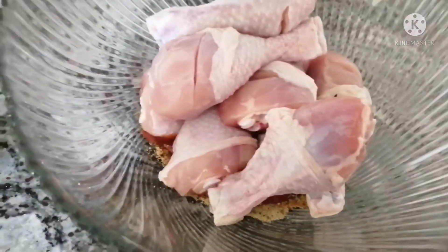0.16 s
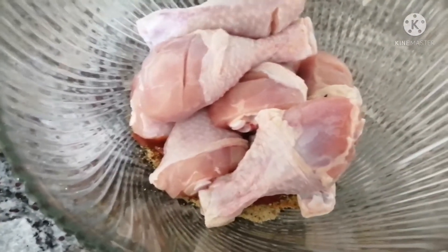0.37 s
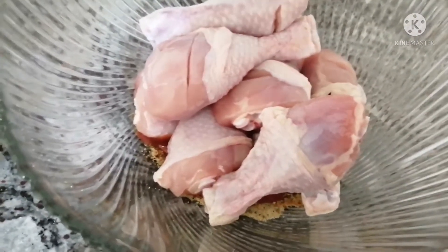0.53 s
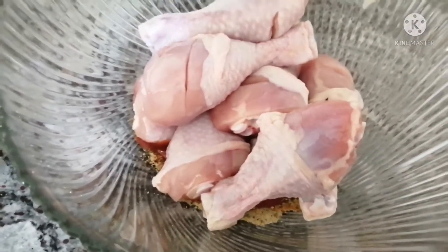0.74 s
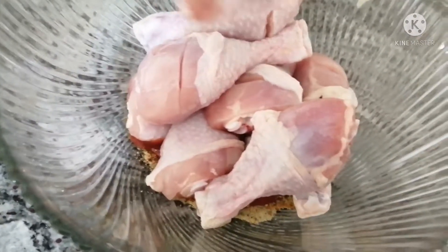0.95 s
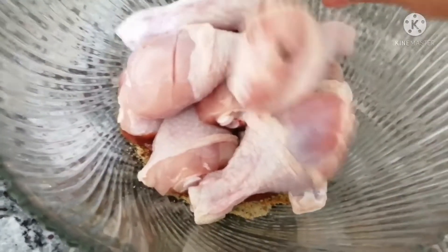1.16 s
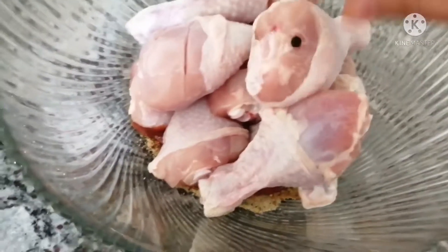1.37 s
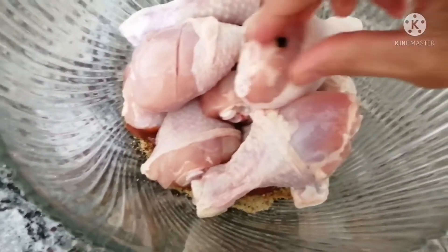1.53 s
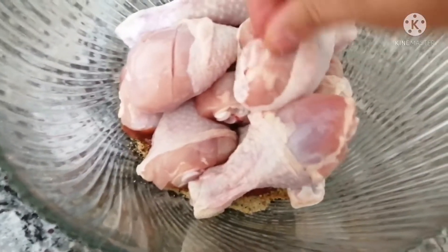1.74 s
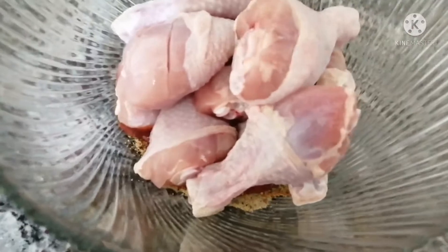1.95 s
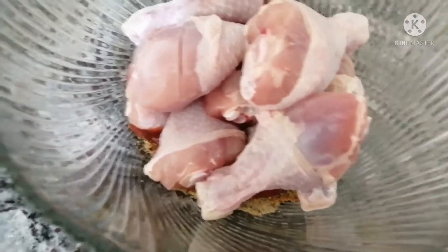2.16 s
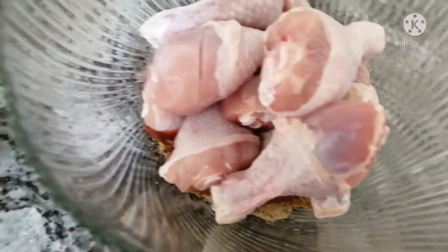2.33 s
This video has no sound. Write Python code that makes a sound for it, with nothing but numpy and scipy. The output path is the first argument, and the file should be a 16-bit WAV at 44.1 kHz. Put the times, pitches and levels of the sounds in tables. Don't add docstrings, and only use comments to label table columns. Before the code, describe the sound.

Close stereo microphone near a worktop: two quick hollow knocks bounce off the walls and fade slowly over an appliance buzz, followed by a faint thud and glass ping, small wet ticks and a brief peeling rustle.

```python
import sys
import numpy as np
from scipy import signal
from scipy.fft import rfft, irfft, next_fast_len
from scipy.io import wavfile
from scipy.ndimage import uniform_filter1d, map_coordinates

SR = 44100
rng = np.random.default_rng(int(sys.argv[2]) if len(sys.argv) > 2 else 0)


def decibels_to_gain(level_db):
    exponent = np.asarray(level_db, float) / 20
    return 10 ** exponent


def wav_record(signal):
    frames = np.transpose(np.atleast_2d(signal))
    bounded = np.clip(frames, -1, 1)
    quanta = np.round(bounded * 32767).astype(np.int16)
    wavfile.write(sys.argv[1], SR, quanta)


N = 110250
SIDES = np.array([[.5], [-.5]])

# (time [s], level [dB], crack level [dB], near wall delay [s], pan of the lowest note [dB])
BLOWS = [
    (.2381, -15, -9, 0.0105, 4),
    (.4133, -10.5, -11, .0078, -2),
]


def unit(x):
    return x / np.sqrt(np.mean(x ** 2) + 1e-20)


def along(points, hz):
    f, v = np.transpose(points)
    return np.interp(np.log(hz + 1), np.log(f + 1), v)


def wobble(rate):
    knots = rng.standard_normal(int(N * rate / SR) + 4)
    return map_coordinates(knots, [np.arange(N) * rate / SR])


def filtered(x, response):
    m = next_fast_len(x.shape[-1] + 8192)
    spectrum = rfft(x, m) * response(np.fft.rfftfreq(m, 1 / SR))
    return irfft(spectrum, m)[..., :x.shape[-1]]


def rush(spectrum):
    return unit(filtered(rng.standard_normal((2, N)), lambda hz: decibels_to_gain(along(spectrum, hz))))


def spread(pair, alike, pan, lead_s):
    def mix(hz):
        turn = np.arccos(np.clip(along(alike, hz), -1, 1)) / 2
        return np.array([np.cos(turn), np.sin(turn)])

    def place(hz):
        return decibels_to_gain(SIDES * along(pan, hz)) * np.exp(2j * np.pi * hz * lead_s * SIDES)

    mid, side = filtered(pair, mix)
    return filtered(np.array([mid + side, mid - side]), place)


def add(out, x, s, pan_db=0, lag_s=0):
    x = np.broadcast_to(x, (2, x.shape[-1]))
    for ch in range(2):
        part = out[ch, round((s + ch * lag_s) * SR):][:x.shape[1]]
        part += x[ch, :len(part)] * decibels_to_gain(pan_db * (.5 - ch))


def decay(db, t60, rise_s):
    t = np.arange(SR // 3) / SR
    return decibels_to_gain(db - 60 * t / t60) * (1 - np.exp(-t / rise_s))


def mode(hz, db, t60, rise_s):
    return decay(db, t60, rise_s) * np.sin(2 * np.pi * hz * np.arange(SR // 3) / SR)


def hum():
    # (multiple of the fundamental, level [dB])
    harmonics = [(2, -62), (3, -63.5), (4, -70), (5, -71.5), (6, -66), (7, -64.5), (8, -65.5), (9, -62.5)]
    # (frequency [Hz], density [dB per Hz])
    drone_colour = [(12, -44), (20, -1), (37, -4.5), (101, -5), (140, -6), (214, -10.5), (380, -2),
                    (407, -8), (520, -23.5), (680, -78), (1140, -120)]
    # (frequency [Hz], density [dB per Hz])
    hiss_colour = [(300, -27), (500, -4), (1900, -14), (2800, -9.5), (4000, -19), (5300, -9), (7000, -20),
                   (15000, -23)]
    # (frequency [Hz], left minus right [dB])
    balance = [(60, -1), (240, -6), (950, -3), (3770, -3), (15000, 0.5)]
    # (time [s], gain [dB])
    gain = [(0, -0.5), (.24, 0.5), (.27, -4.5), (.7, -4.5), (1.0, -1), (2.5, -1)]
    fundamental_hz, drift_rad, waver_db, scatter_rad = 43.35, 0.17, 1, 0.14
    t = np.arange(N) / SR
    turns = fundamental_hz * t + drift_rad * wobble(6) / (2 * np.pi)
    lines = 0
    for multiple, db in harmonics:
        level = np.sqrt(2) * decibels_to_gain(db + waver_db * wobble(8.0))
        phase = 2 * np.pi * (multiple * turns + rng.random()) + scatter_rad * wobble(14)
        lines = lines + level * np.sin(phase)
    lines = filtered(lines, lambda hz: decibels_to_gain(SIDES * along(balance, hz)))
    drone = decibels_to_gain(-60.5) * spread(rush(drone_colour), [(30, 0.18), (100, .7), (400, 0.71)], balance, 0)
    hiss = decibels_to_gain(-69.5) * spread(rush(hiss_colour), [(600, .5), (3000, 0.14), (12000, 0.046)], balance, 0)
    return (lines + drone) * decibels_to_gain(np.interp(t, *np.transpose(gain))) + hiss


def echoes():
    # (frequency [Hz], density [dB per Hz])
    colour = [(210, -74), (350, -21.5), (744, -3), (1080, -10), (1360, -24), (2620, -24.5), (4020, -37),
              (5810, -32.5), (12000, -64), (15600, -99), (22000, -120)]
    # (frequency [Hz], width [Hz], boost [dB])
    resonances = [(798, 65, 2.5), (1070, 60, 6.5), (5250, 600, 7.5)]
    # (frequency [Hz], t60 [s])
    t60 = [(400, 1.8), (800, 1.507), (2000, 1.82), (5500, 1.23), (10000, 0.26)]
    # (frequency [Hz], time [s])
    hold = [(500, 0.18), (1000, 0.29), (5000, 0.2), (10000, 0.097)]
    # (frequency [Hz], depth [dB])
    lumpiness = [(900, 2.5), (2500, .8), (6000, .5)]
    # (frequency [Hz], boost [dB])
    early = [(1200, -2.5), (3000, 4.5), (9000, 4.5)]
    # (frequency [Hz], likeness [0-1])
    alike = [(400, 0.51), (1200, 0.41), (3000, 0.13), (8000, 0.73)]
    # (frequency [Hz], left minus right [dB])
    balance = [(60, 34), (240, 1), (950, -7), (3770, 0.5), (15000, -27.5)]
    levels = [-37, -39]
    # (frequency [Hz], density [dB per Hz])
    earlier_colour = [(350, -31.5), (530, -0.5), (800, -10.5), (1200, -10), (2000, -41.5)]
    knee_s, early_s, rise_s = 0.047, 0.11, 0.005
    seconds = np.arange(N) / SR

    def resonate(hz):
        return decibels_to_gain(sum(db * np.exp(-((hz - c) / w) ** 2) for c, w, db in resonances))

    out = np.zeros((2, N))
    for (s, *_), db in zip(BLOWS, levels):
        hz, t, z = signal.stft(unit(filtered(rush(colour), resonate)), SR, nperseg=256)
        past_hold = knee_s * np.logaddexp(0, (t - along(hold, hz)[:, None]) / knee_s)
        lumps = uniform_filter1d(rng.standard_normal(z.shape[1:]), size=4, axis=0)
        lumps = unit(uniform_filter1d(lumps, size=7, axis=1))
        shape_db = along(lumpiness, hz)[:, None] * lumps
        shape_db = shape_db + along(early, hz)[:, None] * np.exp(-t / early_s)
        shape_db = shape_db - 60 * past_hold / along(t60, hz)[:, None]
        tail = signal.istft(z * decibels_to_gain(shape_db), SR, nperseg=256)[1][:, :N]
        tail = spread(tail, alike, balance, 0.0003) * (1 - np.exp(-seconds / rise_s))
        add(out, decibels_to_gain(db) * tail, s)
    earlier = spread(rush(earlier_colour), alike, balance, 0.00031)
    return out + earlier * decibels_to_gain(-67 - 60 * seconds / 2)


def peeling(out):
    # (frequency [Hz], density [dB per Hz])
    colour = [(280, -53), (480, -26.5), (566, -0.5), (1530, -24.5), (1970, -14), (3620, -20), (5860, -3.5),
              (10000, -30), (13000, -65), (22000, -120)]
    # (time [s], level [dB])
    bursts = [
        (2.384, -67),
        (2.395, -53),
        (2.414, -53),
        (2.432, -52.5),
        (2.449, -50.5),
        (2.476, -53),
        (2.49, -61),
    ]
    add(out, rush(colour) * decibels_to_gain(-64), bursts[0][0], -2.5)
    for s, db in bursts:
        add(out, rush(colour)[:, :SR // 3] * decay(db, .05, 0.00031), s, -2.5)


def ticks(out):
    # (time [s], level [dB], centre frequency [Hz], t60 [s], pan [dB])
    touches = [(.2215, -52, 15000, 0.014, -7), (1.656, -67, 5600, 0.2, 0), (1.191, -60, 3700, .015, 0),
               (1.1905, -47, 1170, 0.012, -2), (1.2035, -61, 14000, 0.008, 1.5),
               (1.161, -64, 11000, .008, 0), (1.1802, -60, 5900, 0.07, 0), (1.2432, -43, 14200, 0.014, -4),
               (1.2432, -47, 11300, 0.012, -1), (1.2432, -53, 8000, 0.016, -10),
               (1.243, -58, 2000, 0.022, -1), (1.243, -62, 3300, .015, -3), (1.1905, -54, 1800, .04, -8),
               (1.651, -54, 5500, 0.035, -9), (1.651, -58, 8800, 0.03, -9),
               (1.851, -63.5, 7500, .015, -4.5), (.7365, -50, 2200, .015, 2),
               (2.377, -44, 7200, 0.047, 4.5), (2.377, -47, 5300, 0.039, -7.5),
               (2.379, -56, 3200, 0.032, -5), (2.377, -57, 2200, 0.045, 2), (2.377, -54, 12500, 0.024, 1.5),
               (2.377, -51, 664, 0.036, -6.5), (2.377, -54, 9700, .025, 2), (.238, -40, 4000, .022, 6),
               (.238, -42, 10000, .015, 7), (.238, -45, 13500, .015, 2)]
    for s, db, centre_hz, t60, pan_db in touches:
        shared, apart = rng.standard_normal(SR // 3), rng.standard_normal((2, SR // 3))
        noise = filtered(shared + 2.4 * apart,
                         lambda hz: np.exp(-(np.log((hz + 1) / centre_hz) / 0.2) ** 2))
        add(out, unit(noise) * decay(db, t60, 0.00033), s, pan_db)


def snaps(out):
    # (time [s], frequency [Hz], level [dB], t60 [s], pan [dB])
    short_rings = [(1.6514, 5650, -31, .008, -4), (1.6525, 4950, -43, .025, -4), (1.6525, 6350, -45, .02, -4),
                   (1.651, 8500, -45, .009, -6), (1.651, 9600, -46, .008, -6), (1.6585, 5900, -49, .01, -4),
                   (1.6645, 5600, -48, .016, -4), (1.1905, 1700, -45, .022, -8), (1.1912, 760, -39, .04, 6),
                   (1.1912, 480, -42, .04, 0), (1.1905, 2800, -56, .012, -2), (.7368, 1800, -36, .016, 2),
                   (.7368, 2700, -38, .016, 2), (.7368, 2250, -41, .012, 2), (1.2428, 5400, -55, .022, -6),
                   (2.3775, 2050, -54, .04, 2), (2.3772, 7000, -44, .02, 4), (2.450, 2050, -64, .08, 0),
                   (2.378, 680, -50, .05, -4), (.4135, 1600, -27, .03, 6), (.4135, 2300, -35, .025, 4),
                   (.2385, 460, -29, .05, 5), (.2383, 1180, -28, .025, 2), (.2383, 5000, -33, .015, 3)]
    for s, hz, db, t60, pan_db in short_rings:
        add(out, mode(hz, db, t60, .0008), s, pan_db)


def ping(out):
    # (frequency [Hz], level [dB], t60 [s])
    modes = [(5168, -52, .11), (5529, -62, .085), (6272, -65, .09), (3278, -68, .3)]
    add(out, sum(mode(hz, db, t60, 0.00031) for hz, db, t60 in modes), 1.1802, 1.5)


def thuds(out):
    # (level [dB], frequency [Hz], t60 [s])
    modes = [(-38.5, 94.3, 0.14), (-37.5, 331, 0.057), (-41.5, 201, 0.067), (-42.5, 550, 0.079),
             (-48, 890, 0.079), (-40, 138, 0.13), (-45, 110, 0.2), (-43, 170, 0.18), (-37, 400, 0.056),
             (-46, 270, 0.06), (-50, 33, 0.5), (-54.5, 580, 0.15), (-46, 430, 0.038), (-37.5, 220, 0.055),
             (-41, 240, 0.073), (-47.5, 57, 0.18)]
    starts = [1.188, 1.191, 1.188, 1.191, 1.191, 1.222, .436, .416, .238, .414, 1.385, 2.462, .238, .24,
              .416, 1.23]
    for s, (db, hz, t60) in zip(starts, modes):
        add(out, mode(hz, db, t60, 0.0032), s, -1.5)


def bowl():
    out = np.zeros((2, N))
    ticks(out)
    ping(out)
    snaps(out)
    thuds(out)
    peeling(out)
    return out


def hollow(held_s, pan_db, pitch=1):
    # (frequency [Hz], level [dB], sign, pan [dB])
    modes = [(764, -1, 1, 0), (1050, -6, -1, .5), (500, -17, -1, 2.5), (1250, -20, 1, 5), (1620, -17, 1, 5),
             (1890, -16, -1, 5.5), (2260, -23, 1, 5.5), (2760, -24, 1, 5.5)]
    rise_s, ring_t60, sag_db = .0007, .016, -1
    t = np.arange(SR // 8) / SR
    fall_db = sag_db * t / held_s - 60 * np.maximum(t - held_s, 0) / ring_t60
    envelope = (1 - np.exp(-t / rise_s)) * decibels_to_gain(fall_db)
    notes = []
    for hz, db, sign, lean_db in modes:
        level = sign * decibels_to_gain(db + SIDES * lean_db + rng.normal(0, 1))
        notes.append(level * np.sin(2 * np.pi * pitch * hz * t))
    low, *upper = notes
    return envelope * (decibels_to_gain(SIDES * pan_db) * low + sum(upper))


def slaps(out):
    # (time [s], level [dB], held [s], pitch ratio)
    returns = [
        (.7312, -28, .0098, 1.04),
        (.7445, -33, .012, 1.36),
        (.7935, -34, .006, 1.1),
    ]
    for s, db, held_s, pitch in returns:
        dulled = filtered(hollow(held_s, 0, pitch), lambda hz: 1 / (1 + (hz / 1250) ** 8))
        add(out, decibels_to_gain(db) * dulled, s, -10, 0.00047)


def knocks():
    # (frequency [Hz], density [dB per Hz])
    colour = [(500, -44.5), (1200, -1), (2200, -5), (4000, -18.5), (6200, -5), (9000, -25.5), (14500, -28),
              (16000, -53.5)]
    treble = [20000, 6000]
    wall_pitches = [1.0, .8]
    held_s, lead_in_s, note_lag_s, crack_lag_s = .0045, .005, .00028, 0.00047
    wall_db, wall_crack_db = -12.5, -6
    out, t = np.zeros((2, N)), np.arange(SR // 8) / SR
    for (s, db, crack_db, wall_s, pan_db), dull_hz, wall_pitch in zip(BLOWS, treble, wall_pitches):
        crack = filtered(rush(colour), lambda hz: 1 / (1 + (hz / dull_hz) ** 2))[:, :len(t)]
        crack = crack * decibels_to_gain(db + crack_db + 3.5 - 60 * t / 0.023)
        direct, wall = (0, 0, 0, 1), (wall_s, wall_db, wall_crack_db, wall_pitch)
        for after_s, loss_db, soft_db, pitch in [direct, wall]:
            add(out, decibels_to_gain(db + loss_db) * hollow(held_s, pan_db, pitch), s + after_s, 0, note_lag_s)
            add(out, decibels_to_gain(loss_db + soft_db) * crack, s + after_s, pan_db, crack_lag_s)
        add(out, decibels_to_gain(db - 27) * hollow(lead_in_s, 0), s - lead_in_s, 0, note_lag_s)
    slaps(out)
    return out


def scene():
    return hum() + echoes() + bowl() + knocks()


def band_limit(x):
    return signal.sosfilt(signal.butter(12, 16450, fs=SR, output="sos"), x)


def record(dry):
    limited = filtered(dry, lambda hz: 1 / (1 + (hz / 15250) ** 60))
    return band_limit(limited)


dry = scene()
out = record(dry)
wav_record(out)
```